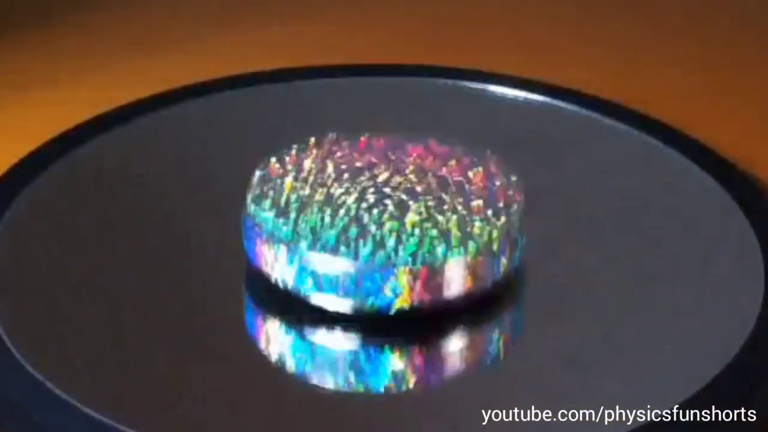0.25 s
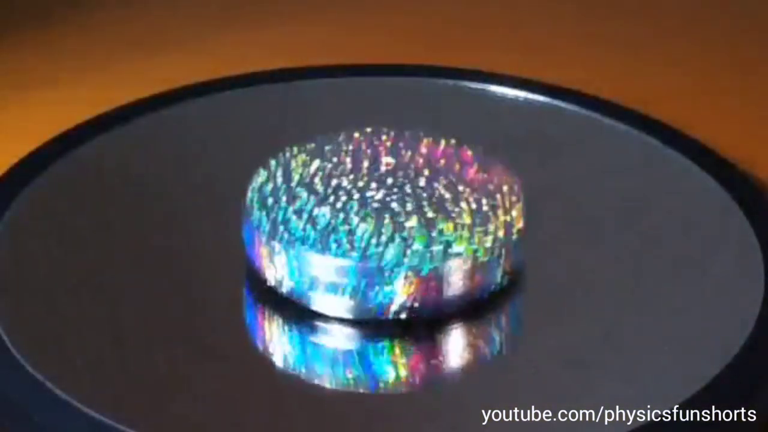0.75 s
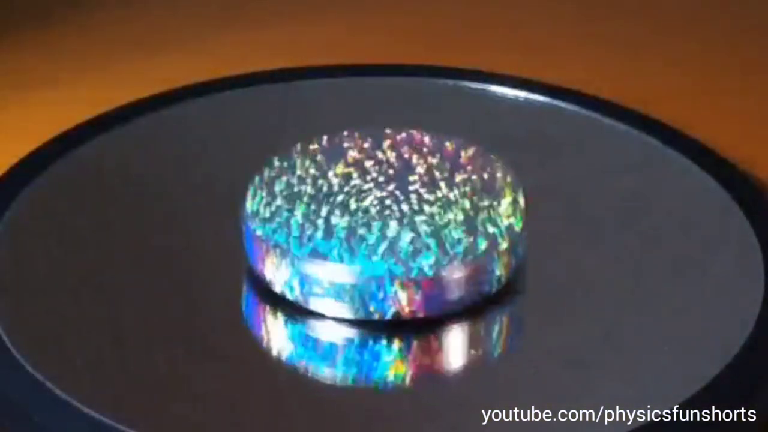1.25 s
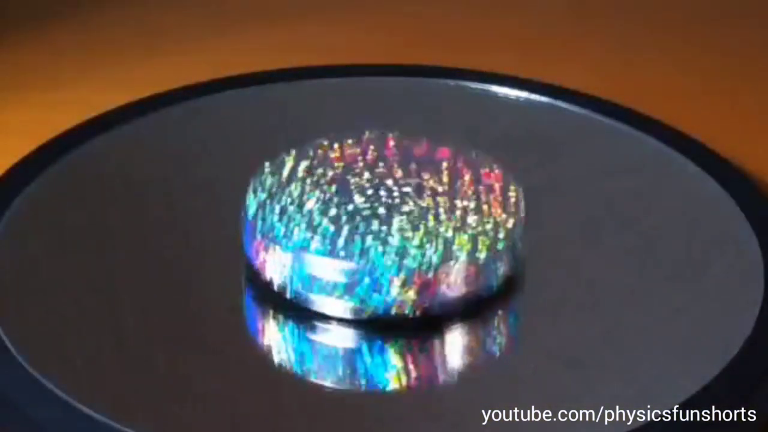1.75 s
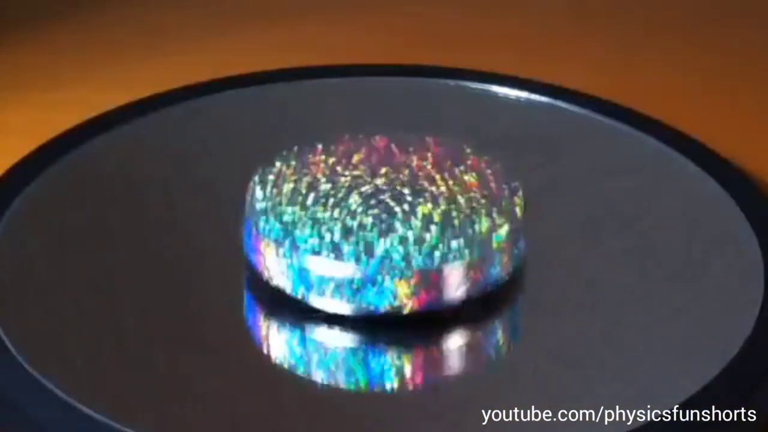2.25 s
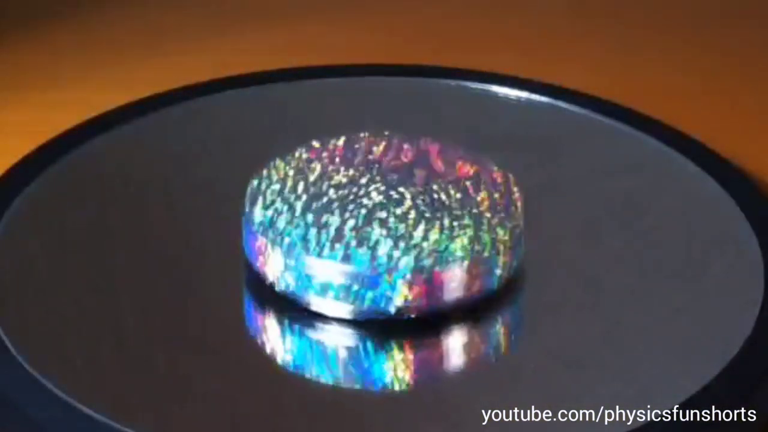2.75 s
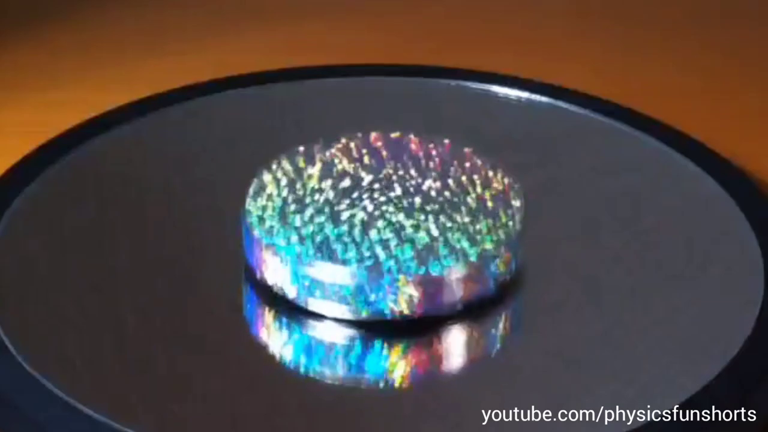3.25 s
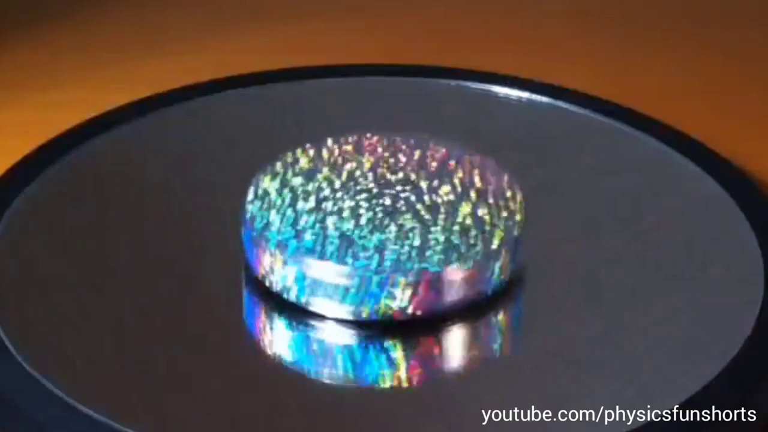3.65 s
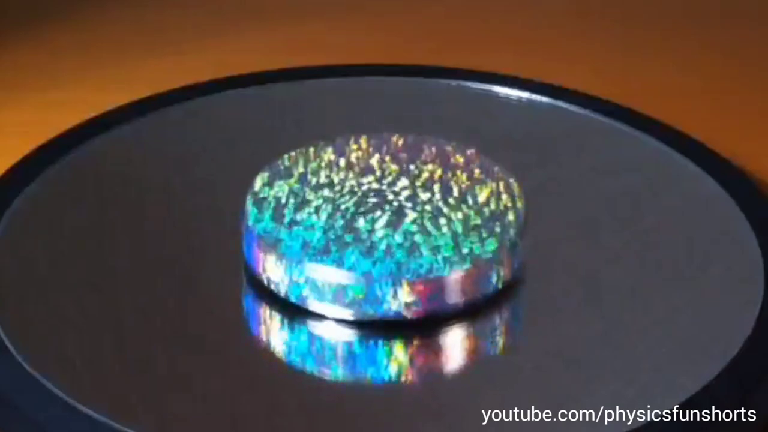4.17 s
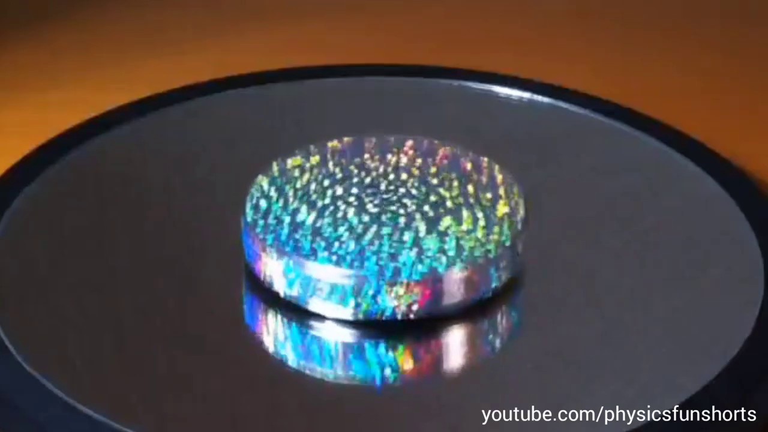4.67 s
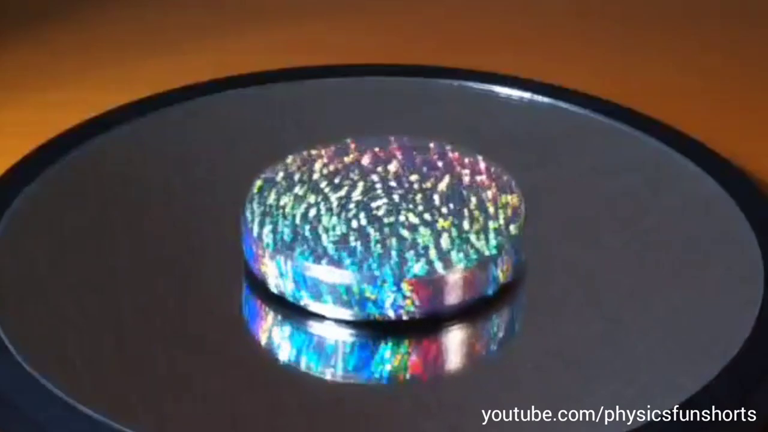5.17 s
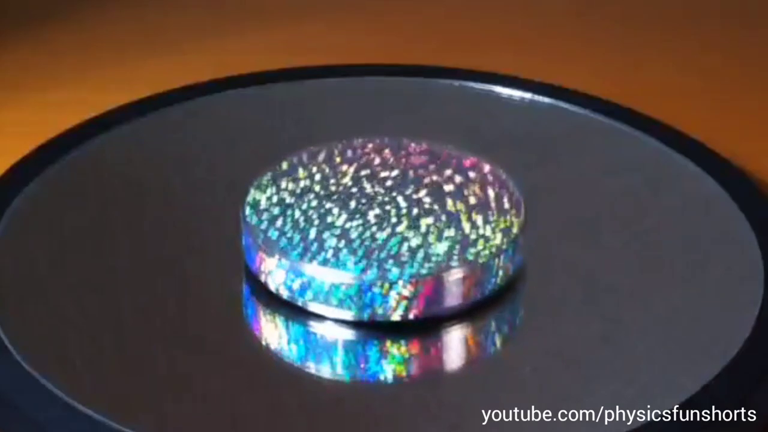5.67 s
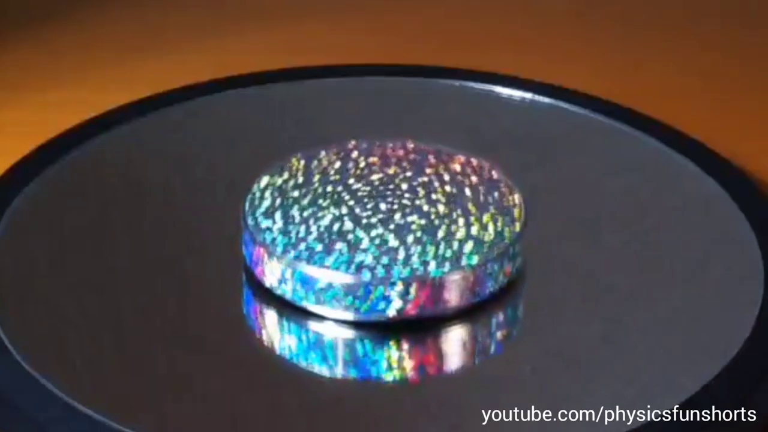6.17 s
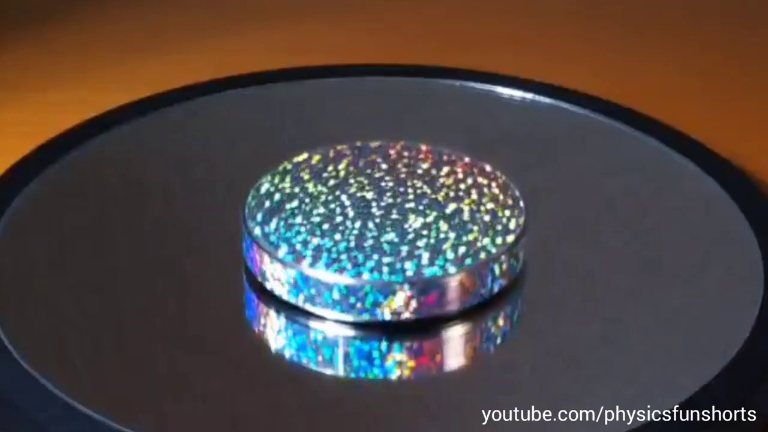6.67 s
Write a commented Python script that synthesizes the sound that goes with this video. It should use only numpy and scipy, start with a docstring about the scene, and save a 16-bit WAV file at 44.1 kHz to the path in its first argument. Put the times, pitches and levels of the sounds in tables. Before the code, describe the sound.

A heavy steel disk wobbles on a glass dish, its rapid metallic knocking flutter speeding up steadily over a ringing, hissing whir in a quiet room.

```python
"""A quiet room: a heavy steel disk wobbles ever faster on a glass dish.
Once a turn a nick in its rim knocks the dish: impulses excite decaying modes in families, and each
family swells and fades as the knocked spot creeps round past node lines. Between knocks the rim rolls
over fine roughness, heard as ringing and hiss, and the stand hums on low multiples of the turning rate.
Late on, one harder landing rings the low families and thumps the stand."""
import sys
import numpy as np
from scipy import signal
from scipy.fft import rfft, irfft, next_fast_len
from scipy.io import wavfile
from scipy.ndimage import uniform_filter1d, map_coordinates

SR = 44100
rng = np.random.default_rng(int(sys.argv[2]) if len(sys.argv) > 2 else 0)


def materialize(psi):
    """Save the field psi as 16-bit PCM at rate SR to the path in sys.argv[1].

    A 1-D psi becomes a single channel; in a 2-D psi each row is a channel.
    """
    bounded = np.clip(np.atleast_2d(psi).T, -1, 1)
    quanta = np.round(bounded * 32767).astype(np.int16)
    wavfile.write(sys.argv[1], SR, quanta)


N = 305083


def amp(db):
    """Decibel law: level to amplitude ratio."""
    return 10 ** (np.asarray(db) / 20)


def unit(x):
    """Normalization to unit root mean square."""
    return x / np.sqrt(np.mean(x ** 2) + 1e-20)


def along(points, hz):
    """Interpolation of (hz, value) points on a logarithmic frequency axis."""
    f, v = np.transpose(points)
    return np.interp(np.log(hz + 1), np.log(f + 1), v)


def curves(rows):
    """Linear interpolation in time: one value per sample for each column after start_s."""
    s, *cols = np.transpose(rows)
    return [np.interp(np.arange(N) / SR, s, c) for c in cols]


def wobble(rate):
    """Band-limited random fluctuation: a smooth curve through rate random knots a second."""
    knots = rng.standard_normal(int(N * rate / SR) + 4)
    # the spline is read every 16 samples, then joined by straight lines
    coarse = map_coordinates(knots, [np.arange(N // 16 + 2) * 16 * rate / SR])
    return np.interp(np.arange(N) / 16, np.arange(len(coarse)), coarse)


def filtered(x, response):
    """Linear filtering: the spectrum of x times a response of frequency."""
    m = next_fast_len(N + SR // 2)
    return irfft(rfft(x, m) * response(np.fft.rfftfreq(m, 1 / SR)), m)[..., :N]


def ring(drive, modes, attack=0.0018, life=1):
    """Modal superposition: the drive convolved with decaying sines; little radiates far below them."""
    t = np.arange(SR // 8) / SR
    kernel = sum(np.sign(sign) * amp(db - 60 * t / (life * t60)) * np.sin(2 * np.pi * hz * t)
                 for hz, db, t60, sign in modes)
    edge = signal.butter(2, 0.44 * modes[0][0], "high", fs=SR, output="sos")
    return signal.oaconvolve(drive, signal.sosfilt(edge, kernel * (1 - np.exp(-t / attack))))[:N]


# small wander of the knock: start_s [s], late_ms [ms]
LATENESS = [(0, -1.1), (.25, -1.6), (.9, .5), (2.2, 1.9), (3.8, -2), (4.8, .2), (5.5, 0), (6.2, .7),
            (6.45, -.6), (6.6, -.3), (6.8, -1.2), (6.92, -3)]
# turns grow as a power of the time left before the disk falls flat
FALL_S, TURNS_AT_FALL, TURN_SCALE, TURN_POWER = 7.14634, 172.61826, 42.43853, 0.71932


def turning():
    """Finite-time power law of a settling disk: turns counted at each sample, ever faster."""
    t = np.arange(N) / SR - curves(LATENESS)[0] / 1000
    return TURNS_AT_FALL - TURN_SCALE * (FALL_S - t) ** TURN_POWER


# knocked spot creeping round the dish: start_s [s], angle_deg [degrees]
SPOT = [(0, -32), (.23, 12.5), (1.05, 51.5), (1.86, 95), (3, 145), (4.14, 182.5), (5.3, 227.5),
        (6.38, 268.5), (6.6, 291.5), (6.92, 312.5)]


def on_dish(turns):
    """Change of reference frame: turns counted from a mark on the dish instead of the nick."""
    return turns + curves(SPOT)[0] / 360


# nodes of each family, then the click: loudest_angle_deg [degrees], node_depth_db [dB], narrowness [-]
NODES = [(93, -22.5, 2), (5, -5, 4.7), (45, -6, 0.71), (47.4, -10.5, 3.16), (3, -5, 0.52), (3, -3, 2.5),
         (43.7, -4, 8.2), (47.6, -14, 1.24), (45.5, -1.5, 1), (47, -5, 1.4)]
# angular order of each row of NODES: lines [-]
NODE_LINES = [1, 1, 2, 2, 2, 2, 2, 2, 2, 2]


def fading():
    """Mode-shape coupling: loss in dB as the knocked spot nears the node lines of each family."""
    angle, = curves(SPOT)
    return [depth_db * np.abs(np.sin(np.radians(lines * (angle - loudest)))) ** (2 * narrow)
            for (loudest, depth_db, narrow), lines in zip(NODES, NODE_LINES)]


# relative drive at each family's loudest place: start_s [s], then lowest_db, low_db, middle_db, main_db,
# upper_db, valley_db, high_db, snap_db, low_middle_db, click_db [dB]
KNOCK = [(0, -53, -44.5, -50, -33, -29, -64, -48, -35, -51, -58),
         (.2, -56, -49.5, -48, -28.5, -26.5, -65, -48, -34, -51, -48),
         (.4, -44, -49.5, -47, -30.5, -27, -49, -60, -27, -52, -48),
         (.8, -69, -49, -49.5, -26.5, -30.5, -44, -52, -45, -52, -50),
         (1.5, -55.5, -65, -50.5, -27.5, -33, -48, -54, -14.5, -54.5, -48),
         (1.8, -53, -59, -50, -33.5, -30, -50, -50, -15, -49, -53),
         (2.1, -50, -62, -47, -28.5, -27, -48, -48, -15, -48, -50),
         (2.3, -49.5, -65, -50, -26, -30, -46, -40, -28, -49, -52),
         (2.55, -50, -57, -48, -24, -26, -43, -37, -30, -45, -52),
         (2.9, -52, -48, -53, -23.5, -26, -44, -32.5, -43, -43.5, -45.5),
         (3.2, -52, -47, -46, -24, -34, -45, -37, -25, -45, -47),
         (3.5, -47, -39, -43, -20, -40, -50, -30, -27, -43, -45),
         (3.9, -71, -41.5, -39, -22, -36, -50, -34.5, -13, -44, -53),
         (4.2, -75, -46.5, -43.5, -24, -38, -45, -35.5, -12, -46, -48),
         (4.8, -70, -43.5, -47.5, -25, -49.5, -41, -47, -18, -52.5, -50),
         (5.4, -55, -47, -48, -24.5, -41, -52, -38, -28.5, -47, -50),
         (5.9, -63, -66, -56.5, -24, -36.5, -57, -52, -17, -48, -51.5),
         (6.3, -68, -54, -55, -22.5, -35.5, -59, -51, -24, -47, -46),
         (6.52, -63, -50, -51, -25, -28, -63, -81, -24, -52, -52),
         (6.64, -50, -50, -41, -25.5, -30, -47, -58, -27, -45, -50),
         (6.71, -53, -51, -51, -26, -29, -45, -57, -19, -41, -49),
         (6.79, -54, -60, -48, -21, -21.5, -45, -57, -22, -42, -51),
         (6.86, -53, -51, -51, -26, -32, -44, -47, -19, -47, -46),
         (6.92, -51, -50, -57, -25, -36, -46, -48, -23, -57, -52)]


def reach():
    """Modal excitation: relative drive of each family and of the click at the struck spot, dB."""
    return [db + loss for db, loss in zip(curves(KNOCK), fading())]


# broad treble resonances of disk and dish: pitch_hz [Hz], width_hz [Hz], level_db [dB]
SHEEN = [(4340, 81, 9), (4476, 40, 10), (5480, 215, 7.5), (5806, 56, 8.5), (6590, 110, 5), (9630, 1020, 6),
         (11520, 230, 9)]
# relative noise spectrum under the resonances: pitch_hz [Hz], density_db [dB per Hz]
HISS = [(150, 8.5), (400, -50), (620, -24), (720, -48), (810, -17), (900, -13), (1500, 4), (2100, -1.5),
        (2700, -6), (3100, -2.5), (3450, -8.5), (3900, -9), (4300, -5), (5000, -3), (8000, -4), (10200, -5),
        (12000, -9.5), (14000, -9), (15200, -25)]


def hiss(low_hz, high_hz):
    """Friction noise shaped by resonance: steel on glass between two soft band edges."""
    def response(f):
        peaks = 1 + sum((amp(db) - 1) / (1 + ((f - c) / (width / 2)) ** 2) for c, width, db in SHEEN)
        edges = ((1 + (low_hz / (f + 1)) ** 8) * (1 + (f / high_hz) ** 8)) ** -.5
        return amp(along(HISS, f)) * peaks * edges
    return unit(filtered(rng.standard_normal(N), response))


# own landing of each knock near the fall: start_s [s], strength_db [dB], rebound_db [dB]
LATE_KNOCKS = [(5.726, 1.5, -12), (5.762, -1, -16), (5.798, -2.5, -24), (5.833, 1, -15), (5.869, -0.5, -10),
               (5.904, -1, -19), (5.938, 0.5, -12), (5.973, 1.5, -17), (6.007, -0.5, -10),
               (6.041, -2.5, -11), (6.074, 4.5, -16), (6.107, -2, -13), (6.14, -5, -18), (6.173, 0.5, -9),
               (6.205, 3, -8), (6.238, 0.5, -15), (6.269, -4, -17), (6.301, -2.0, 0), (6.332, -0.5, 0),
               (6.363, 1, -1), (6.393, 0, -9), (6.423, -1.5, -7), (6.453, -9, -17), (6.482, -2.5, -8),
               (6.511, 0, -2), (6.54, 1.5, -5), (6.568, 0, -1), (6.596, 0.5, -3), (6.623, 0.5, -11),
               (6.651, 1, -14), (6.677, -1, -25), (6.704, -2, -19), (6.729, 0.5, -8), (6.755, 1, -7),
               (6.78, -2.5, -2), (6.804, -1.5, -3), (6.828, -3, -7), (6.852, -2, -7), (6.875, -5, -13),
               (6.897, 0.0, -13)]
# earlier rebounds, away from the nodes: start_s [s], rebound_db [dB]
REBOUND = [(0, -48), (.6, -37), (1.5, -15.5), (3, -69), (4.3, -20.5), (5.2, -47), (5.7, -25)]
REBOUND_GROWS = 1.79  # dB more rebound per dB that the main family fades
SWAY_DB = .8  # over a few knocks


def blow_train(turns):
    """Periodic impulsive excitation: one blow a turn, each with a rebound; returns hit mask and blows."""
    # the blow starts 0.83 ms before the turn is full
    edge = np.floor(turns + 0.00083 * np.gradient(turns) * SR)
    hit = np.diff(edge, prepend=edge[0] - 1) > 0
    strength_db, late_rebound_db = (c[hit] for c in curves(LATE_KNOCKS))
    near_fall = np.flatnonzero(hit) / SR > LATE_KNOCKS[0][0] - .01
    first = np.zeros(N)
    first[hit] = amp(np.where(near_fall, strength_db, SWAY_DB * wobble(4.5)[hit]))
    early_rebound_db = (curves(REBOUND)[0] - REBOUND_GROWS * fading()[3])[hit]
    again = first.copy()
    again[hit] *= amp(np.where(near_fall, late_rebound_db, early_rebound_db))
    return hit, first + np.pad(again, (round(.0095 * SR), 0))[:N]  # rebound 9.5 ms later


# mode families of the dish, each mode: pitch_hz [Hz], level_db [dB], t60_s [s before any shortening],
# sign at the microphone [-]
DISH = [
    [(526, -1, 0.12, -1)],
    [(391, -9.5, 0.069, 1), (637, 4.5, 0.078, 1)],
    [(983, 4.5, 0.048, -1), (1045.6, -4, 0.12, -1), (1192, -6, 0.073, -1)],
    [(1346, 3, 0.018, -1), (1560, -26, 0.01, 1), (1455, 3.5, 0.057, 1), (1602, -6.5, 0.021, 1)],
    [(1877, 8.5, 0.015, 1), (1770, -5, 0.016, -1), (2200, -9, 0.0062, 1), (1989, -10, 0.071, 1),
     (2137, -15.5, 0.11, -1)],
    [(2517, -10.5, 0.024, 1), (2680, -2, 0.011, 1)],
    [(2940, 6.5, 0.025, 1), (3065, 5, 0.019, 1)],
    [(1385, -3.5, 0.02, 1), (1660, -19.5, 0.0081, 1)],
    [(829.7, 5.5, 0.052, 1)],
]
# rise of each family: attack_s [s]
ATTACK_S = [0.0007, 0.0032, 0.0011, 0.0013, 0.0009, 0.0019, 0.0015, 0.00013, .001]
# how dry the knocks ring, now shorter, now longer: start_s [s], share of short ring [0-1]
DRYNESS = [(0, 0.23), (.3, 0.2), (.6, 0.2), (1.1, .1), (1.5, 0.2), (2, 0.25), (2.25, 0.27), (2.5, 0.52),
           (2.8, 0.78), (3.1, .5), (3.5, 0.5), (3.8, 0.41), (4.4, 0), (4.8, 0.22), (5.2, 0.2), (5.8, 0.42),
           (6.2, 0.52), (6.5, 0.25), (6.65, 0.65), (6.78, 0.67), (6.92, 0.67)]
# slow filling of the main mode from its neighbours: start_s [s], level_db [dB]
BLOOM = [(0, -45), (.5, -37), (1.2, -37), (1.55, -29), (1.75, -29), (1.95, -28.5), (2.2, -25.5), (2.4, -35),
         (3.4, -40), (3.9, -34), (4.3, -30.5), (4.6, -33), (6.2, -41), (6.55, -34), (6.92, -41)]
SCATTER_DB = 1.3  # from knock to knock
TICK_DB = 16  # tick over the click level


def knocks(turns):
    """Impact response: blows ring the mode families, with a sharp tick and a puff of hiss."""
    hit, blows = blow_train(turns)
    scatter_db = SCATTER_DB * rng.standard_normal((int(hit.sum()), len(NODES))).T
    latest = np.maximum(np.cumsum(hit) - 1, 0)  # index of the knock now sounding
    *levels, click_db = reach()
    drives = [blows * amp(db + 1.5 + chance[latest]) for db, chance in zip(levels, scatter_db)]
    short = np.clip(curves(DRYNESS)[0], 0, 1)
    body = sum(ring((1 - short) * drive, modes, rise) + ring(short * drive, modes, rise, life=0.26)
               for modes, drive, rise in zip(DISH, drives, ATTACK_S))
    bloom = ring(blows * amp(curves(BLOOM)[0]), [(1450.5, 4.6, .05, 1)], attack=0.013)
    click = blows * amp(click_db + scatter_db[-1][latest])
    puff_decay = amp(12.0 - 60 * np.arange(SR // 25) / SR / 0.032)  # 60 dB in 32 ms
    puff = signal.fftconvolve(click, puff_decay)[:N] * hiss(3200, 9400)
    band = signal.butter(2, [3000, 8000], "band", fs=SR, output="sos")
    tick = amp(TICK_DB) * signal.sosfilt(band, click)
    return body + bloom + puff - tick


def texture(turns, memory, size=512):
    """Cyclic surface roughness: size cells met again each turn and renewed over some turns."""
    field = rng.standard_normal((round(turns[-1] - turns[0]) + 40, size))  # one row a turn
    laps = np.arange(-12, 13)
    field = signal.fftconvolve(field, np.exp(-(laps[:, None] / memory) ** 2), "same", axes=0)
    place = [turns - turns[0] + 16, turns % 1 * size]
    return unit(map_coordinates(field, place, order=1, mode="grid-wrap"))


# relative layer levels: start_s [s], ring_db, scrape_db, fizz_db, hum_db [dB]
ROLL = [(0, -40.5, -42, -43.5, -75.5), (1.2, -42, -39.5, -41.5, -66.5), (1.55, -42, -40.5, -42, -69),
        (1.9, -42, -43, -42, -69.5), (2.2, -42, -43.5, -42, -68), (2.6, -41.5, -43.5, -43, -69.5),
        (3.3, -40, -44.5, -40.5, -69.5), (3.9, -39, -39.5, -41.5, -62), (4.6, -37.5, -39.5, -40.5, -66),
        (5.3, -39, -35.5, -41.5, -58.5), (5.8, -37, -36, -41.5, -64), (6.2, -37, -37, -42, -55.5),
        (6.5, -39.5, -37, -41.5, -58), (6.75, -38, -37.5, -41, -53.5), (6.92, -35, -36.5, -44, -49.5)]
# rough stretches of track: start_s [s], scrape_place [turns after the knock], scrape_swell_db [dB],
# fizz_place [turns after the knock], fizz_swell_db [dB]
PATCH = [(0, 0.88, 4.5, 0.52, 6), (1.2, 0.39, 1.5, 0.68, 1.5), (2.6, -0.011, 3.5, 0.29, 7),
         (4.2, -0.013, 4, 0.32, 5), (5, -0.74, 2, 0.65, 3), (6.2, -0.88, 1.5, 0.21, 3.5),
         (6.92, -0.41, 6.5, .15, 3)]
# relative rolling level of each family: level_db [dB]
ROLL_DB = [-30, -25, -14, -6.5, -7, -14, -12, -10, -19]
# share of the knock's swell that each family's rolling ring copies: share [0-1]
ROLL_FOLLOWS = [0.36, 0.33, 0.45, .5, 0.45, .4, 0.33, .3, .4]
# rough specks of the dish in scrape, shine and fizz: depth_db [dB]
GRIT_DB = [1.5, 1, 1.7]
REPEAT = .65  # power share of the roughness met again a turn later
CHATTER_DB, CHATTER_TURNS = 6, .2  # the rim chatters on after the nick
SHINE_DB, SHINE_FADE_S = -41.5, 2.79  # fades as the disk sinks; 1 dB down at this time


def rolling(turns):
    """Rolling-contact noise: roughness keeps the dish ringing, and hiss swells on rough track."""
    ring_db, scrape_db, fizz_db, _ = curves(ROLL)
    place, swell_db, fizz_place, fizz_swell_db = curves(PATCH)

    def bump(at, sharp):
        """Circular bell: a swell to 1 once a turn."""
        return np.exp(sharp * (np.cos(2 * np.pi * (turns - at)) - 1))

    drive = np.sqrt(REPEAT) * texture(turns, memory=4.6) + np.sqrt(1 - REPEAT) * rng.standard_normal(N)
    chatter_db = CHATTER_DB * np.exp(-(turns % 1) / CHATTER_TURNS)
    drive = drive * amp(1.17 * wobble(60) + 1.6 * wobble(5) + chatter_db)
    # a family that the knock reaches well is also reached well by the rolling rim
    body = sum(amp(db + share * (near - near.mean())) * unit(ring(drive, modes, life=0.83))
               for modes, db, share, near in zip(DISH, ROLL_DB, ROLL_FOLLOWS, reach()))
    grit = [amp(db * texture(on_dish(turns), memory=3.7, size=40)) for db in GRIT_DB]
    rough = amp(swell_db * bump(place, 1.0))
    scrape = amp(scrape_db - 3.0) * unit(rough * grit[0] * hiss(290, 7160))
    # a treble resonance
    shine_db = SHINE_DB - (np.arange(N) / SR / SHINE_FADE_S) ** 4
    shine = amp(shine_db) * unit(rough ** 1.6 * grit[1] * hiss(5150, 5950))
    fizz = amp(fizz_swell_db * bump(fizz_place, 4.4)) * grit[2] * hiss(7860, 7700)
    top = amp(1.2 * bump(fizz_place + 0.23, 2.5) + .4 * wobble(300)) * hiss(12000, 20000)
    treble = amp(fizz_db) * (amp(-3.0) * unit(fizz) + amp(-12.5) * unit(top))
    return amp(ring_db - 3.0) * unit(body) + scrape + shine + treble


# relative response of the stand: pitch_hz [Hz], level_db [dB]
STAND = [(24, -57), (45, -35), (70, -14), (92, 0), (102, 1.5), (120, 5), (160, 2), (200, -8.5), (300, -4.5),
         (420, 0), (520, -30), (620, -42), (1060, -120)]
# strength of multiples 2, 3, 4 .. of the turning rate: level_db [dB]
ORDER_DB = [-11, -1.5, -3, 1, -1.5, -1.5, -1, -2, -4, -1, -4, -8.5, -3.5, -1, 3, -13, -5]
# multiple that leads the hum: start_s [s], multiple [-]
LEAD = [(0, 6), (3.2, 6), (3.6, 5.4), (5.5, 5.4), (6.05, 5), (6.4, 4.2), (6.65, 3), (6.92, 3)]
# gain of the multiples from the 7th up: start_s [s], gain_db [dB]
BUZZ = [(0, -4), (2, -1), (3.5, -3.5), (4.5, 1.5), (5.5, 2.5), (6.1, 2), (6.5, 1), (6.92, 3.5)]
LEAD_DB, LEAD_WIDTH = 6.5, 0.75  # how far the leader stands out; over how many multiples
HUM_PLACE, HUM_SPREAD = 1.05, .035  # hardest push on the dish; scatter per multiple, both in turns


def stand(turns):
    """Forced resonance: each multiple of the turning rate is loud while it crosses the stand's peak."""
    rate = np.gradient(turns) * SR
    place = on_dish(turns) - HUM_PLACE
    lead, buzz_db = curves(LEAD)[0], curves(BUZZ)[0]
    hum = np.zeros(N)
    for k, db in enumerate(ORDER_DB, start=2):
        lead_db = LEAD_DB * np.exp(-((k - lead) / LEAD_WIDTH) ** 2)
        drift_db = 2.5 * wobble(1.01)
        level_db = db + along(STAND, k * rate) + (k > 6) * buzz_db + lead_db + drift_db
        hum += amp(level_db) * np.cos(2 * np.pi * k * (place + HUM_SPREAD * rng.standard_normal()))
    running_level = np.sqrt(uniform_filter1d(hum ** 2, size=SR // 3))
    rumble = unit(filtered(rng.standard_normal(N), lambda f: amp(along(STAND, f))))
    return amp(curves(ROLL)[3]) * (hum / running_level + amp(-16) * rumble)


# relative spectrum of the quiet air: pitch_hz [Hz], density_db [dB per Hz]
ROOM = [(25, -12), (50, -1), (100, -38), (190, 2.5), (290, -2), (400, 2.5), (600, -1.5), (720, -18),
        (850, -16), (2000, -33)]


def room():
    """Background noise with a shaped spectrum and an unsteady level: the quiet, uneven air of the room."""
    air = unit(filtered(rng.standard_normal(N), lambda f: amp(along(ROOM, f))))
    return amp(-69 + 2.8 * wobble(7)) * air


# one harder landing: start_s [s], relative level_db [dB]
BUMP = [(6.073, -10.5)]


def landing():
    """Impulse response: a harder landing rings the low families and thumps the stand."""
    blow = np.zeros(N)
    for s, db in BUMP:
        blow[round(s * SR)] = amp(db - 37)
    thump = [(150, -15, 0.073, 1)]
    return ring(blow, thump + DISH[0] + DISH[1] + DISH[2], life=1.0)


# cancellation of dish modes at the microphone: pitch_hz [Hz], width_hz [Hz], level_db [dB]
DIPS = [(470, 70, -6), (725, 110, -12)]


def cancelled(x):
    """Destructive interference: quiet gaps between modes, as second-order notches."""
    def response(f):
        return np.prod([(c * c - f * f + 1j * f * width * amp(db)) / (c * c - f * f + 1j * f * width)
                        for c, width, db in DIPS], axis=0)
    return filtered(x, response)


def scene():
    """Superposition: all but the stand's hum passes the cancelling notches."""
    turns = turning()
    notched = cancelled(knocks(turns) + rolling(turns) + landing() + room())
    return (notched + stand(turns))[None]


TOP_HZ = 15230  # band limit


def record(dry):
    """Band limitation: the small microphone drops the deep bass; nothing is kept above the limit."""
    return filtered(dry, lambda hz: (hz < TOP_HZ) / (1 + (45 / (hz + 1)) ** 2))


dry = scene()
out = record(dry)
materialize(out)
```